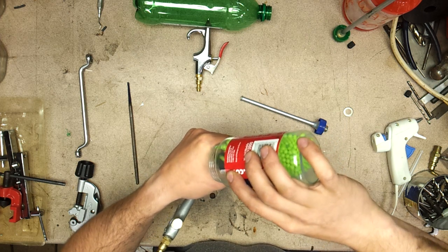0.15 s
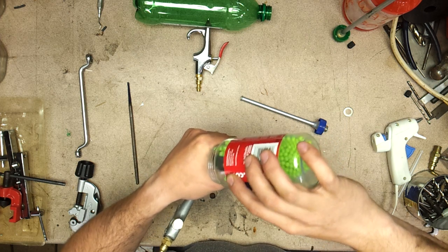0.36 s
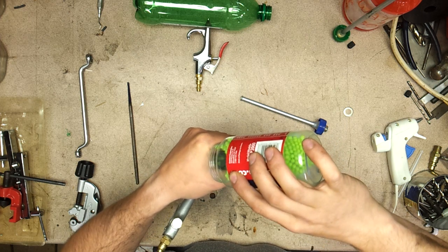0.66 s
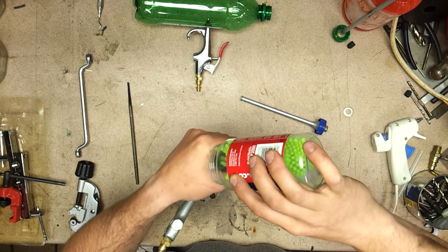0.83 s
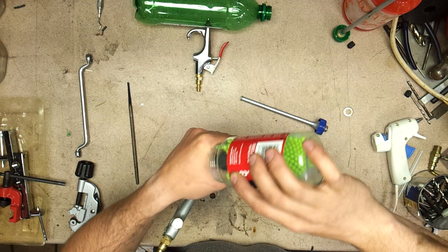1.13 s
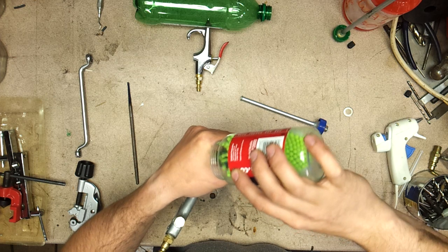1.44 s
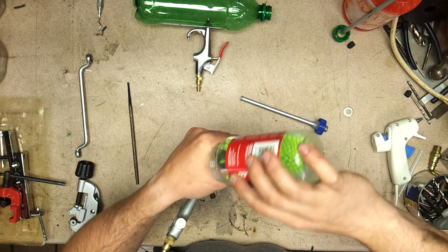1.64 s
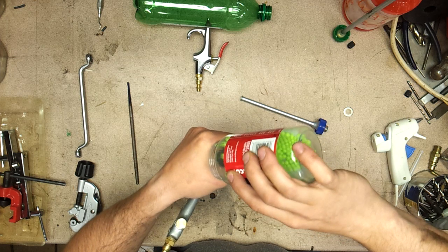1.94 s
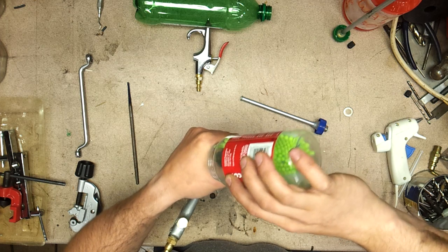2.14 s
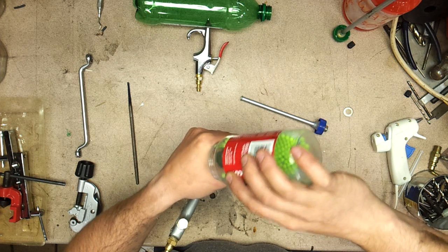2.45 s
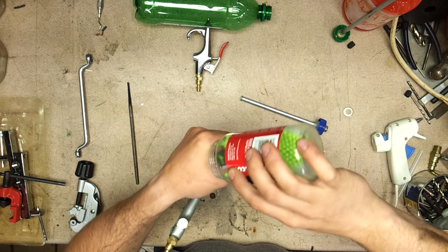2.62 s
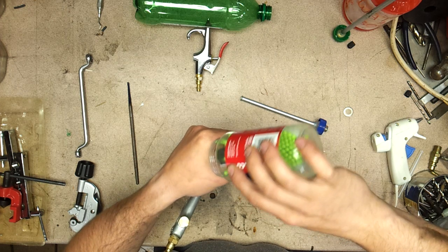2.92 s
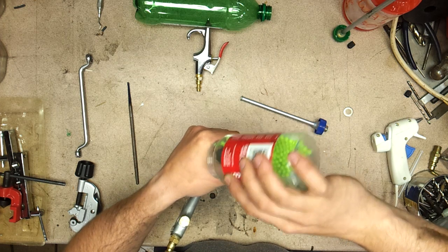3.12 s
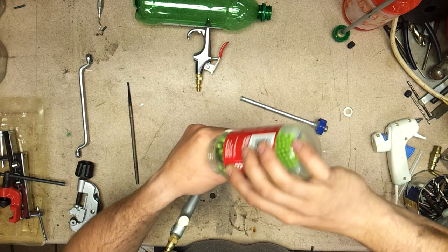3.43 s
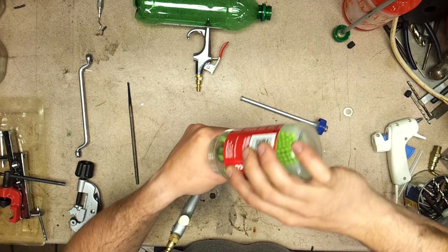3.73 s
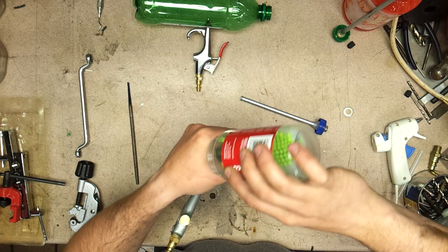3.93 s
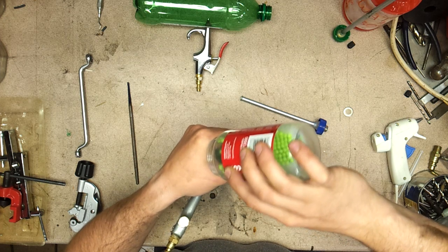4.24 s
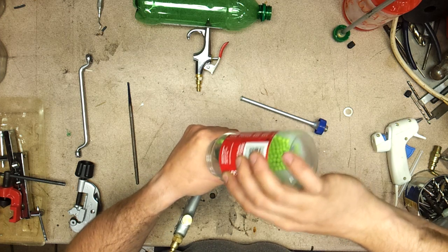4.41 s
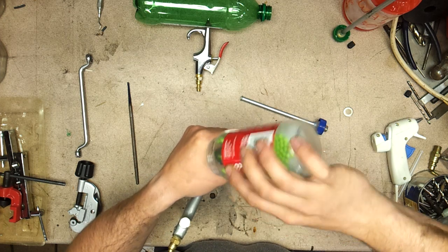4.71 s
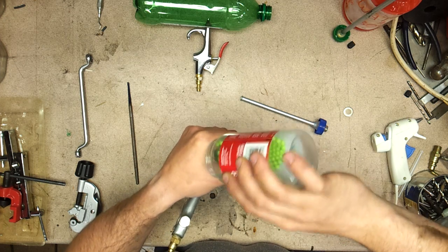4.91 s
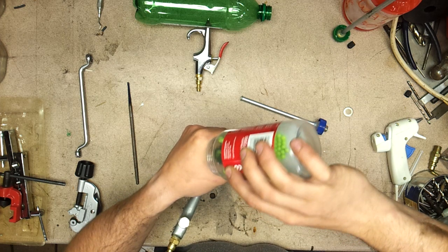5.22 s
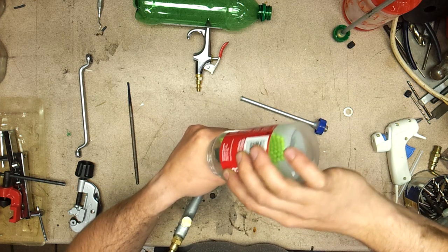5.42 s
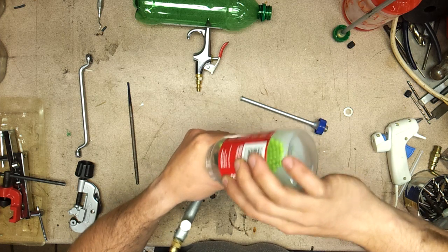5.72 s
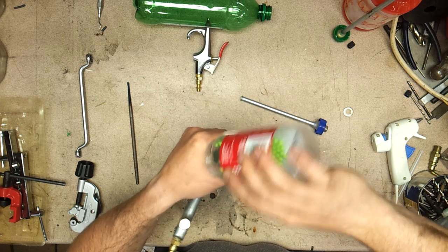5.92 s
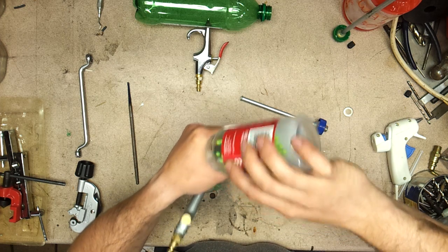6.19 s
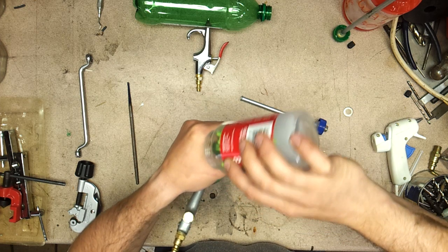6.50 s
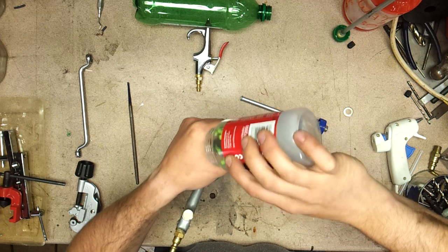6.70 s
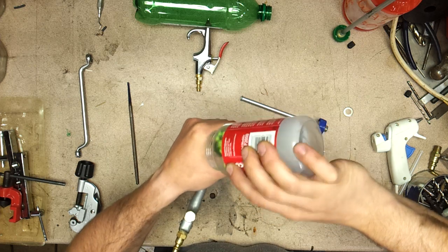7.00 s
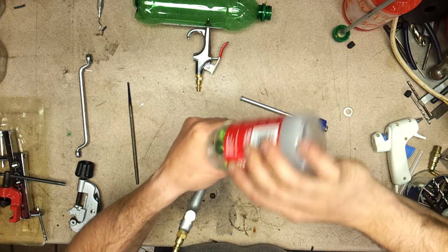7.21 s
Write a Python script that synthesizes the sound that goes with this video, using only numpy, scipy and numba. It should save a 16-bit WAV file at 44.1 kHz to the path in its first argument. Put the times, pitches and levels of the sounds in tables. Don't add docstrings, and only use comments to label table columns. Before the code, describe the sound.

A dense stream of tiny plastic clicks, jerky and uneven, as pellets pour through a fist between two thin plastic containers. It starts full, stutters around one to two seconds, swells again in the middle, nearly runs dry shortly before six seconds, then rattles hard again. Hollow bottle rumble and short plastic pings colour it. The small room is fairly dry, the microphone close, band-limited and overloaded on the loudest knocks.

```python
import sys
import numpy as np
from scipy import signal
from scipy.fft import rfft, irfft
from scipy.io import wavfile
from scipy.ndimage import uniform_filter1d
from numba import njit

SR = 44100
rng = np.random.default_rng(int(sys.argv[2]) if len(sys.argv) > 2 else 0)


def ratio_of_db(decibels):
    return 10 ** (np.asarray(decibels, float) / 20)


def output_pcm(signal):
    pcm = np.clip(np.atleast_2d(signal).T, -1, 1) * 32767
    wavfile.write(sys.argv[1], SR, np.round(pcm).astype(np.int16))


N = 324135


def unit(x):
    return x / np.sqrt(np.mean(x ** 2))


def band_pass(x, order, low_hz, high_hz):
    return signal.sosfilt(signal.butter(order, [low_hz, high_hz], "band", fs=SR, output="sos"), x)


def colour(x, points):
    hz, db = np.transpose(points)
    grid_hz = np.maximum(np.arange(1025) * SR / 2048, 1)
    gain = ratio_of_db(np.interp(np.log(grid_hz), np.log(hz), db))
    cepstrum = irfft(np.log(gain))
    cepstrum[1:1024] *= 2
    cepstrum[1025:] = 0
    return signal.fftconvolve(x, irfft(np.exp(rfft(cepstrum))))[:N]


def walk(rate):
    hold = int(SR / rate)
    levels = rng.standard_normal(N // hold + 1)
    return uniform_filter1d(np.repeat(levels, hold), hold)[:N]


@njit
def grains(start, hz, decay, size, n):
    out = np.zeros(n)
    for k in range(len(start)):
        z = size[k] + 0j
        turn = np.exp(2j * np.pi * hz[k] - decay[k])
        for i in range(start[k], min(n, start[k] + int(6 / decay[k]))):
            out[i] += z.real
            z *= turn
    return out


def clicks(s, gain, chance, ring_ms, scatter_db):
    hz = 200 + 9500 * chance[..., 0]
    decay = 1000 / (SR * ring_ms * (.5 + chance[..., 1]))
    size_db = -scatter_db * np.log(1 - .998 * chance[..., 2])
    size = gain * ratio_of_db(size_db) * np.sqrt(decay)
    start = np.clip(s * SR, 0, N - 1).astype(np.int64)
    return grains(start.ravel(), hz.ravel() / SR, decay.ravel(), size.ravel(), N)


def ring(push, modes):
    t = np.arange(SR // 8) / SR
    reply = sum(ratio_of_db(db) * np.sin(2 * np.pi * hz * t) * 1000. ** (-t / t60) for hz, db, t60 in modes)
    return signal.fftconvolve(push, reply / np.sqrt(np.sum(reply ** 2)))[:N]


def flow():
    # time in seconds, level in dB, share that hits the walls in dB.
    trickle_points = [(0, -16.5, 1.5), (.45, -18.5, -4), (.62, -19, -1.5), (1.05, -18, -1),
                      (1.24, -28.5, -4.5), (1.36, -21, -2.5), (1.49, -24.5, -3), (1.8, -20, -4),
                      (2.1, -27.5, 0.5), (2.5, -18, 0.5), (3.15, -18, 0), (4.35, -17.5, 0.5),
                      (5.4, -18, -3), (5.7, -40, 1), (5.86, -33.5, 2), (6.0, -23, -9), (6.3, -18.5, 1),
                      (7.35, -18, 2.5)]
    # fullest moment in seconds, level in dB, rise in seconds, fall in seconds.
    gush_events = [(0.029, -8, 0.11, 0.16), (.83, -9, 0.074, 0.075), (1.642, -13, 0.046, 0.061),
                   (2.23, -19, 0.039, 0.088), (3.4, -16.5, 0.08, 0.087), (3.6, -10.5, 0.088, 0.18),
                   (3.9, -14.5, 0.047, 0.092), (4.66, -19, 0.088, 0.043), (4.949, -15.5, 0.15, 0.093),
                   (5.2, -11.5, 0.14, 0.082), (6.39, -12.5, 0.056, 0.042), (6.618, -13, 0.08, 0.14),
                   (7.2, -13.5, 0.079, 0.1)]
    gush_wall_db = .5
    t = np.arange(N) / SR
    s, level_db, wall_db = np.transpose(trickle_points)
    trickle = ratio_of_db(2 * np.interp(t, s, level_db))
    gush = np.zeros(N)
    for at, db, rise, fall in gush_events:
        gush += ratio_of_db(2 * db) * np.exp(-((t - at) / np.where(t < at, rise, fall)) ** 2)
    share = gush / (gush + trickle)
    return 10 * np.log10(gush + trickle), (1 - share) * np.interp(t, s, wall_db) + share * gush_wall_db


def clear_slides():
    # start in seconds, level of the front in
    # dB, wall share in dB, length in milliseconds.
    slide_rows = [(.1058, -17, 16, 28.7), (.2261, -4.5, -11, 5.7), (.2833, -11, 4.5, 15.8),
                  (.3289, -7, 0.5, 14.4), (.3702, -2.5, -6, 4), (.3938, -11, -4, 8.5), (.413, -6.5, -6, 12),
                  (.449, -12.5, 1.5, 12), (.52, -16.5, 3, 11.4), (.5446, -6, -11, 4.2), (.6086, -12, -8, 9.6),
                  (.622, -6.5, 0.5, 4.4), (.6666, -5, -3, 10), (.7052, -6.5, 3.5, 29), (.9528, -5.5, 7, 2.35),
                  (.9849, -1, -0.5, 2.95), (1.0029, -5.5, 0.5, 12.8), (1.0536, -3.5, -5, 2.6),
                  (1.0751, -6.5, 0.5, 4), (1.0995, -8, 7.5, 10.7), (1.1377, -3.5, -4, 7),
                  (1.1559, -6.5, 3.5, 8.3), (1.1752, -9, -7, 7.9), (1.2044, -6.5, -5, 4.6),
                  (1.2179, -7.5, -1, 6.2), (1.2901, -7, 4, 7), (1.402, -13.5, -15, 10.7), (1.4391, -14, -14, 5.4),
                  (1.4692, -17, -12, 4.5), (1.483, -13.5, -17, 2.1),
                  (1.5091, -7.5, 1, 9.9), (1.5358, -7, 4, 5.9), (1.581, -6.5, 0, 9.6), (1.6, -8.5, 3.5, 20),
                 (1.6813, -13, 3, 14), (1.7094, -5.5, 0.5, 15.3), (1.757, -7, -2.5, 9.6),
                 (1.8136, -13, 5.5, 10.4), (1.8757, -4, -2.5, 4), (1.9164, -7, -2, 7.8),
                 (1.979, -7.5, 2, 4.1), (2.0351, -14.5, 7, 11.4), (2.05, -10.5, 0, 8.8),
                 (2.1101, -8.5, 4, 6.5), (2.1337, -8, 1.5, 7), (2.162, -10, -8, 15),
                 (2.194, -16.5, -5, 2.3), (2.212, -11.5, -2.5, 20), (2.264, -6, -7, 14),
                 (2.3445, -9, -6, 20), (2.4002, -9, -7, 17), (2.4707, -9, -8, 15.4), (2.541, -10, -1, 27.3),
                 (2.612, -3.5, -10, 5.4), (2.636, -10.5, 1.5, 6), (2.6935, -7.5, -9, 2.5),
                 (2.7132, -4.5, 5, 3.4), (2.7319, -8, -6, 6), (2.7717, -12.5, -9, 14),
                 (2.818, -9.5, 3.5, 19),
                  (2.8883, -8, -2.5, 20), (2.9227, -8.5, -1, 8.4), (2.958, -11, -4, 29.5),
             (3.0264, -7.5, -1.5, 15.7), (3.088, -7.5, -0.5, 14.8), (3.139, -16.5, -25, 17),
             (3.162, -7, -6, 8.8), (3.2002, -10, -6, 11), (3.3287, -10, -12, 31), (3.664, -15, 9.5, 30),
             (3.7614, -7, 1.5, 27), (3.8875, -17, -5, 7), (3.9812, -16, 1, 9.3), (4.0106, -7.5, -3, 5.7),
             (4.073, -8, 0, 6.5), (4.103, -8.5, -9, 22.5), (4.1248, -11.5, 5, 10.6), (4.178, -5, -3.5, 8),
             (4.209, -14.5, -8, 30), (4.254, -10, -2, 7), (4.302, -15.5, 1, 12), (4.398, -11, -6.5, 6.4),
             (4.425, -15.5, -8.5, 17), (4.4929, -7, -8, 28.5), (4.5605, -9.5, -3, 23.3),
             (4.5959, -6, 11, 3.5), (4.693, -10, -8.5, 20.7), (4.763, -10.5, -18, 44), (4.83, -8, -6.5, 26),
             (5.053, -11, 2, 26),
                  (5.181, -14.5, 5, 20), (5.2058, -8.5, 7, 20), (5.2334, -6.5, -3, 7.5), (5.261, -6, -8, 6),
                (5.3, -6.5, 1.5, 28), (5.3496, -7.5, -7, 8), (5.3948, -6.5, -4, 8.4), (5.414, -5.5, 4, 6.6),
                (5.453, -8.5, -1.5, 6.5), (5.4907, -11, -4, 7.3), (5.5105, -9.5, 0, 9.1),
                (5.5471, -10.5, 2, 6), (5.5764, -5.5, -3.5, 5), (5.625, -13.5, -11, 4.2),
                (5.6633, -20, -3, 2.5), (5.742, -7.5, 9, 4), (5.7818, -8.5, -3, 3.5),
                (5.8193, -8.5, -3, 4.9), (5.8767, -18, -12, 2.5), (5.924, -21, -9, 33),
                (5.981, -11.5, -21, 6.4), (6.053, -18, -1, 9.1), (6.0647, -17.5, -1, 6),
                (6.119, -20.5, -7, 23), (6.137, -9, -14, 6.8), (6.1633, -7, -2, 5), (6.185, -4, -2, 5.5),
                (6.222, -17, 3, 10), (6.2424, -0.5, 6.5, 2.3), (6.261, -6.5, 0.5, 11),
                  (6.2968, -5, -1, 9.7), (6.3092, -9.5, 3.5, 6), (6.3389, -8.5, -3, 28), (6.47, -6.5, 2.5, 11),
              (6.5139, -5, 2, 7.8), (6.545, -13, 1, 20), (6.5587, -10.5, 5.5, 15), (6.597, -11.5, 5.5, 28),
              (6.6545, -9.5, 7.5, 10), (6.6941, -14.5, 4.5, 20), (6.7455, -9, -7, 4.1),
              (6.764, -4.5, 1.5, 6), (6.7842, -11, -4.5, 8), (6.82, -5, 1, 4), (6.8381, -10, -5, 18),
              (6.888, -9, -0.5, 11), (6.9248, -10.5, -3, 8), (6.966, -9.5, -6, 12), (6.9779, -6, 1, 11),
              (7.017, -11, -3, 3.9), (7.0412, -5.5, -1, 2.8), (7.054, -4.5, -6, 3.9),
              (7.0845, -7, -1.5, 29), (7.1641, -6, 11.5, 3), (7.2239, -3, 3, 3.1), (7.2551, -9.5, -2, 9.6),
              (7.284, -7.5, 10.5, 2.6), (7.2962, -11, 7, 8), (7.3214, -5, 0.5, 28)]
    # time in seconds, level in dB.
    lone_pellets = [(0.0329, -5), (0.0501, -4), (0.3588, -10.5), (.492, -17), (0.5633, -14), (1.277, -26),
                    (1.323, -20), (1.5232, -6), (1.8231, -5.5), (1.8428, -18), (1.905, -15),
                    (2.0213, -17.5), (2.381, -17), (2.6681, -8.5), (3.0106, -7), (3.967, -10), (4.319, -9),
                    (4.372, -23), (5.151, -9.5), (5.607, -19), (5.691, -26), (5.902, -29), (5.99, -15),
                    (6.014, -26), (6.033, -19), (6.1037, -26), (6.9473, -23), (7.1895, -15)]
    wall_db, length_ms = -4, 3
    strays = [(s, db, wall_db, length_ms) for s, db in lone_pellets]
    return np.vstack([slide_rows, strays])


def jam(depth_db, ms):
    s = np.sort(clear_slides()[:, 0])
    t = np.arange(N) / SR
    until = np.append(s, 9)[np.searchsorted(s, t)] - t
    return ratio_of_db(-depth_db * np.exp(-until * 1000 / ms))


def stream():
    # frequency in Hz, level in dB, t60 in seconds.
    hollow_modes = [(205, -12.5, 0.068), (302, -1, 0.054), (417.6, 2, 0.057), (680, 9, 0.04)]
    per_second = 8000
    level_db, wall_db = flow()
    chance = rng.random((int(per_second * N / SR), 4))
    roll = unit(clicks(chance[:, 3] * N / SR, 1., chance, ring_ms=0.66, scatter_db=2.5))
    hollow = unit(ring(roll * ratio_of_db(3.3 * walk(20)), hollow_modes)) * ratio_of_db(-21.5 + level_db)
    roll = roll * ratio_of_db(level_db + 2.5 + walk(45)) * jam(depth_db=5.0, ms=11.6)
    high = signal.butter(2, 750, "high", fs=SR, output="sos")
    push = signal.sosfilt(high, roll * ratio_of_db(2 * wall_db - 4.5))
    return roll, push, hollow


def slips():
    count = 120
    chance = rng.random((count, 4))
    swing = 2 * chance - 1
    s = (np.arange(count) + chance[:, 0]) * N / SR / count
    level_db = flow()[0][(s * SR).astype(int)] + 3.5 + 0.5 * swing[:, 1]
    wall_db = 2.5 + 5 * swing[:, 2]
    length_ms = 6 * (.5 + chance[:, 3])
    return np.transpose([s, level_db, wall_db, length_ms])


def slides():
    per_slide = 150
    s, front_db, wall_db, ms = np.vstack([clear_slides(), slips()]).T[:, :, None]
    chance = rng.random((len(s), per_slide, 4))
    late = -np.log(1 - (np.arange(per_slide) + chance[..., 3]) / per_slide)
    spread = 2 * np.maximum(ms, 1) * SR / 1000
    gain = ratio_of_db(front_db + 2.5) * np.sqrt(np.exp(-late) * spread / per_slide)
    at = s + late * spread / SR
    contact = clicks(at, gain, chance, ring_ms=0.42, scatter_db=1.66)
    push = clicks(at, gain * ratio_of_db(0.78 * wall_db - 1.0), chance, ring_ms=0.42, scatter_db=1.66)
    return contact, push


def dips_and_swells():
    # time in seconds, depth in dB (negative: a slight rise).
    brief_dips = [(0.103, 5.5), (0.386, -1), (0.426, 5.5), (0.648, 0), (0.741, 2.5), (0.853, 3), (0.914, 2),
                  (1.497, 4), (1.615, 5), (1.678, 1.5), (1.874, 0), (2.274, 7), (2.46, 2.5), (2.525, 4),
                  (3.182, 7.5), (3.246, 4), (3.319, 5), (3.371, 5), (3.649, -2.5), (3.711, 0.5), (3.903, 2),
                  (4.028, 7), (4.071, 3), (4.086, 3.5), (4.203, 0), (4.285, 8.5), (4.345, 6.5), (4.477, 7),
                  (4.497, 5.5), (4.615, 8), (4.746, 1.5), (5.198, -2), (5.388, 3.5), (5.636, 3), (5.689, 4),
                  (5.832, 1.5), (5.864, 8), (5.93, 8), (5.997, 6), (6.085, 3), (6.159, 0), (6.241, 3.5),
                  (6.325, 0), (6.424, 0), (6.459, 3), (6.536, 3), (7.035, 3), (7.121, -0.5), (7.173, 3),
                  (7.277, 8), (7.327, 5.5)]
    # time in seconds, rise in dB (negative: a slight dip).
    brief_swells = [(0.397, 2.5), (0.449, 4), (0.51, -0.5), (0.532, 6), (1.038, 5), (1.19, 3.5), (1.217, 3),
                    (1.256, 7), (1.282, 3.5), (1.401, 3.5), (1.436, 2.5), (1.469, 1), (1.647, 1.5),
                    (1.863, 5.5), (1.964, 5.5), (2.025, 4), (2.103, 4.5), (2.211, 3.5), (2.232, 4), (2.397, 3),
                    (2.504, 4.5), (2.638, 0), (2.794, 5.5), (2.847, 2.5), (2.922, 3.5), (2.989, 6), (3.22, 2.5),
                    (3.263, 2), (3.45, 4), (3.474, 0.5), (3.533, 2.5), (3.637, 2), (3.866, 3.5), (4.053, 2),
                    (4.103, 1.5), (4.277, 4.5), (4.3, 2), (4.51, -1), (4.648, 4), (4.689, 2.5), (4.825, 2.5),
                    (5.02, -2), (5.484, -5), (5.543, 4.5), (5.621, 3), (5.775, 4), (5.813, 5.5), (5.836, 3),
                    (5.939, 2.5), (5.977, -1), (6.074, 5.5), (6.255, 1), (6.499, 4), (6.557, 4.5), (6.902, 6),
                    (7.078, 0), (7.146, 4)]
    length_ms = 6.4
    db = np.zeros(N)
    reach = np.arange(-2000, 2000)
    bump = np.exp(-(reach * 1000 / SR / length_ms) ** 2)
    for s, change_db in [(s, -depth) for s, depth in brief_dips] + list(brief_swells):
        at = np.clip(int(s * SR) + reach, 0, N - 1)
        db[at] += 1.05 * change_db * bump
    return ratio_of_db(db)


def gripped_walls(push, detune):
    # frequency in Hz, level in dB, t60 in seconds.
    wall_modes = [(311.5, -16.5, 0.061), (401, -14.5, 0.081), (720, -6, 0.0086), (940, -13.5, 0.03),
                  (1190, -25.5, 0.057), (1436, -2.5, 0.033), (1697, -8, 0.048), (2194, 4.5, 0.0097),
                  (2539, 5.5, 0.021), (2854, 1, 0.017), (3020, -6.5, 0.06), (4170, -7, 0.012)]
    tight = np.clip(.5 + 1.8 * walk(6), 0, 1)
    out = np.zeros(N)
    for share, k in ((tight, 1 + detune), (1 - tight, 1 - detune)):
        out += ring(push * np.sqrt(share), [(hz * k, db, t60) for hz, db, t60 in wall_modes])
    return out


def ticks():
    # time in seconds, peak in dB.
    single = [(0.49, 2), (0.5644, -4), (0.607, 3), (1.3242, -9), (1.3618, -7), (1.3752, -10), (1.4437, -2),
              (1.4704, -7), (1.4822, -10), (1.8447, -3), (1.8757, 11.5), (1.9069, -7), (2.0232, -6),
              (2.7718, -5.5), (5.5767, -9), (5.743, 5), (5.8196, -14), (5.876, -14.5), (5.9898, -5),
              (6.0038, -8), (6.023, -10.5), (6.035, -12.5), (6.1202, -6.5), (7.0417, -1)]
    hardest = [.0121, .0275, .034, .0448, .0581, .0649, .0737, .0817, .1258, .2873, .7263, .8055, .8312,
               .8417, .9546, 1.6389, 3.5243, 3.5819, 3.6048, 3.6352, 3.7915, 5.2347, 5.3253, 6.2439, 6.4717,
               6.5173, 6.607, 6.7803, 7.1001, 7.2281, 7.2532]
    tick_hz, tick_ms, tick_db, knock_db = 4700, 0.17, -1, 9.5
    s, db = np.transpose(list(single) + [(s, knock_db) for s in hardest])
    same = np.ones(len(s))
    start = (s * SR).astype(np.int64)
    tick = grains(start, same * tick_hz / SR, same * 1000 / (SR * tick_ms), -ratio_of_db(db + tick_db), N)
    return band_pass(tick, 2, 2200, 6600)


def pings():
    # time in seconds, frequency in Hz, level in dB.
    notes_sung = [(0.013, 2930, -11.5), (0.2, 4970, -13), (0.288, 2727, -16.5), (0.847, 3120, -22),
                  (1.036, 6160, -19.5), (1.059, 2480, -15), (1.101, 5680, -17), (1.472, 3630, -25),
                  (1.539, 2720, -13.5), (1.683, 1650, -25), (1.759, 6330, -16), (2.094, 5900, -25),
                  (2.113, 3590, -20), (2.199, 2500, -24), (2.503, 4540, -20), (2.638, 4290, -17.5),
                  (2.822, 2550, -13.5), (2.848, 2460, -17.5), (2.905, 3400, -18.5), (2.997, 6140, -19.5),
                  (3.09, 2490, -12.5), (3.273, 4350, -17), (3.404, 4630, -12), (3.534, 4570, -12),
                  (3.583, 2510, -19.5), (3.641, 2800, -17.5), (3.729, 2890, -11), (3.873, 2150, -26.5),
                  (4.056, 2500, -21), (4.132, 3790, -14), (4.133, 2730, -13.5), (4.184, 4570, -19),
                  (4.403, 2520, -22.5), (4.648, 6400, -17), (4.704, 3120, -14), (4.818, 3040, -18),
                  (5.01, 1356, -28.5), (5.02, 4310, -20), (5.153, 2810, -14), (5.309, 2730, -18),
                  (5.33, 2556, -13), (5.354, 1720, -25.5), (5.354, 2790, -19.5), (5.42, 1655, -18.5),
                  (6.166, 2890, -18), (6.246, 2850, -17.5), (6.246, 6270, -18), (6.412, 2850, -17),
                  (6.473, 4400, -17), (6.478, 1870, -18.5), (6.518, 2230, -16), (6.561, 2980, -14),
                  (6.699, 1340, -27), (6.7, 2506, -14), (6.783, 2760, -9), (6.827, 5760, -17),
                  (6.841, 2810, -14), (7.144, 6550, -20.5), (7.189, 1330, -25.5), (7.306, 2780, -14)]
    rise_ms, ring_ms, lead_s = 2, 5.45, .005
    s, hz, db = np.transpose(notes_sung)
    start = ((s - lead_s) * SR).astype(np.int64)

    def fading(ms):
        return grains(start, hz / SR, np.full(len(s), 1000 / (SR * ms)), ratio_of_db(db + 14), N)

    return fading(ring_ms) - fading(rise_ms)


def room(x):
    t60_s, build_s = 0.24, 0.0042
    t = np.arange(SR // 2) / SR
    tail = rng.standard_normal(len(t)) * 1000. ** (-t / t60_s) * np.minimum(t / build_s, 1)
    return signal.fftconvolve(x, tail / np.sqrt(np.sum(tail ** 2)))[:N]


def workshop():
    # frequency in Hz, level in dB per Hz.
    air_colour = [(88, -55.5), (150, -21), (351, -6.5), (1060, -10), (1320, -2), (3780, -5), (6740, -9.5),
                  (8690, -24), (11300, -78), (19100, -120)]
    # frequency in Hz, rms level in dB.
    hum_tones = [(190, -64), (360, -54.5)]
    t = np.arange(N) / SR
    hum = sum(ratio_of_db(db) * np.sqrt(2) * np.sin(2 * np.pi * hz * t) for hz, db in hum_tones)
    return ratio_of_db(-39.5) * unit(colour(rng.standard_normal(N), air_colour)) + hum


def thuds():
    # time in seconds, level in dB, frequency in Hz.
    bumps = [(0.029, -41.5, 108), (0.699, -46, 78), (.8, -51, 108.3), (1.619, -45.5, 82.4),
             (1.868, -49, 100), (1.97, -65, 100), (2.556, -52, 100.5), (3.549, -43.5, 95),
             (3.66, -43.5, 125), (5.042, -50, 90), (1.02, -52, 131), (1.28, -53, 105), (2.09, -60, 101),
             (2.73, -57, 115), (4.579, -51.5, 126), (5.19, -49, 127), (5.3, -50, 118.3), (5.64, -62, 95),
             (5.87, -62, 110), (6.2, -54, 120), (6.4, -48.5, 130), (6.55, -63, 119), (6.76, -55, 132),
             (7.15, -50, 128)]
    t = np.arange(N) / SR
    rumble = unit(band_pass(rng.standard_normal(N), 3, 95, 170))
    out = np.zeros(N)
    for s, db, hz in bumps:
        swell = np.exp(-((t - s - .04) / 0.067) ** 2)
        out += ratio_of_db(db) * swell * (0.87 * np.sin(2 * np.pi * hz * t) + 0.75 * rumble)
    return out


def scene():
    # frequency in Hz, level in dB per Hz.
    pellet_colour = [(71, -80.5), (120, -31), (289, -14), (512, -21), (682, -17.5), (800, -15.5),
                     (909, -9.5), (1210, -17), (1420, -6.5), (2150, -8.5), (2600, -1.5), (4480, -2),
                     (6880, -5.5), (7530, -14), (8690, -34), (11300, -48.5), (19100, -120)]
    roll, roll_push, hollow = stream()
    slide, slide_push = slides()
    sway = dips_and_swells()
    contact = sway * (roll + slide)
    push = sway * (roll_push + slide_push)
    low = signal.butter(4, 2960, fs=SR, output="sos")
    mixed = contact + signal.sosfiltfilt(low, push - contact)
    near = ratio_of_db(4.5) * colour(mixed, pellet_colour) + ratio_of_db(-17) * gripped_walls(push, detune=0.018)
    near = near + hollow + ticks() + pings()
    return (near + ratio_of_db(-13) * room(near) + workshop())[None]


def top_cut(x):
    return signal.sosfilt(signal.butter(12, 17200, fs=SR, output="sos"), x)


def record(dry):
    band = np.tanh(0.99 * dry) / 0.95
    band = signal.sosfilt(signal.ellip(14, .5, 90, 8800, fs=SR, output="sos"), band)
    band = signal.sosfilt(signal.ellip(6, .5, 56, 186, "high", fs=SR, output="sos"), band)
    mix = np.clip(band + ratio_of_db(-4) * thuds(), -1, 1)
    return top_cut(mix)


dry = scene()
out = record(dry)
output_pcm(out)
```